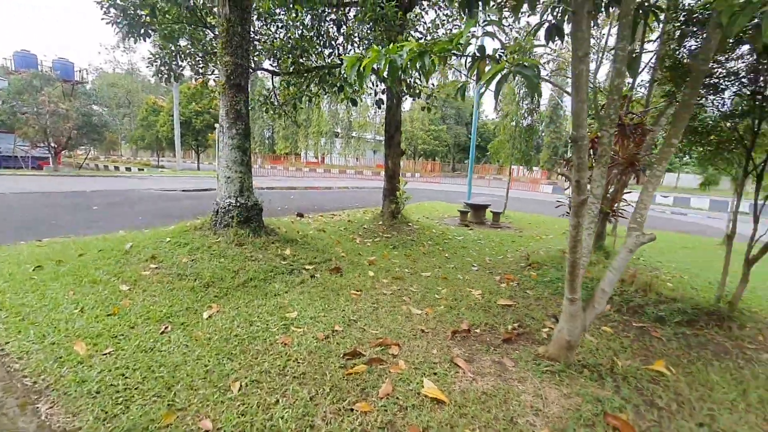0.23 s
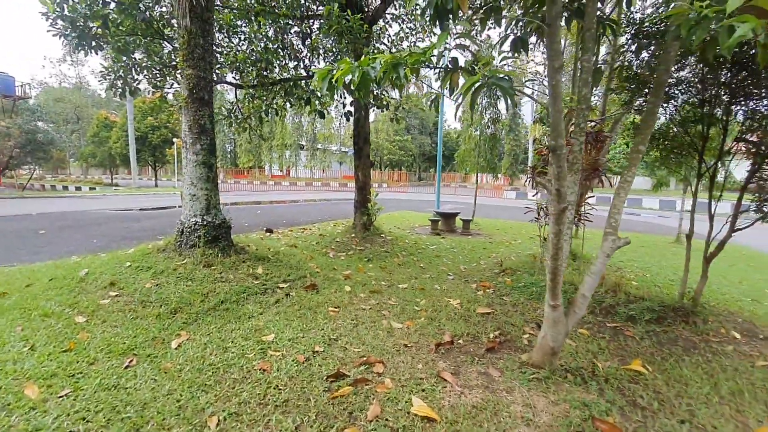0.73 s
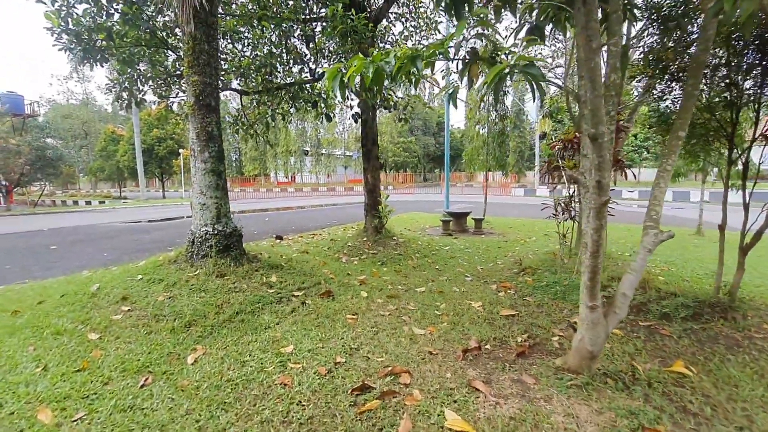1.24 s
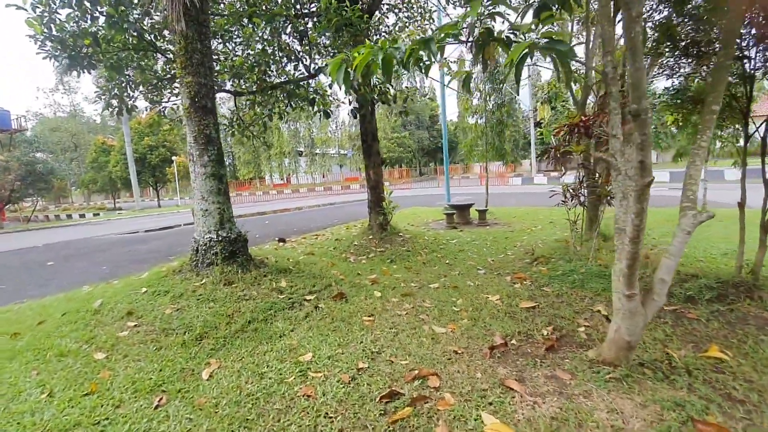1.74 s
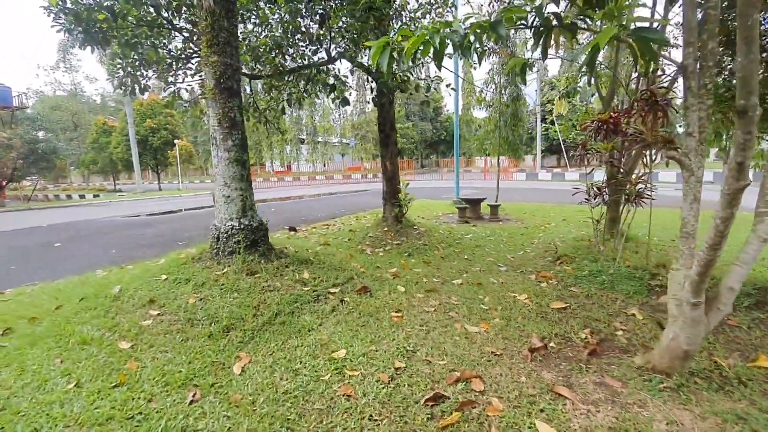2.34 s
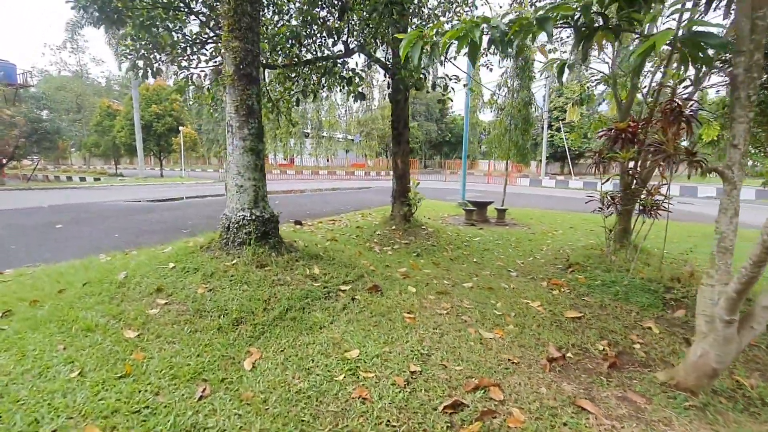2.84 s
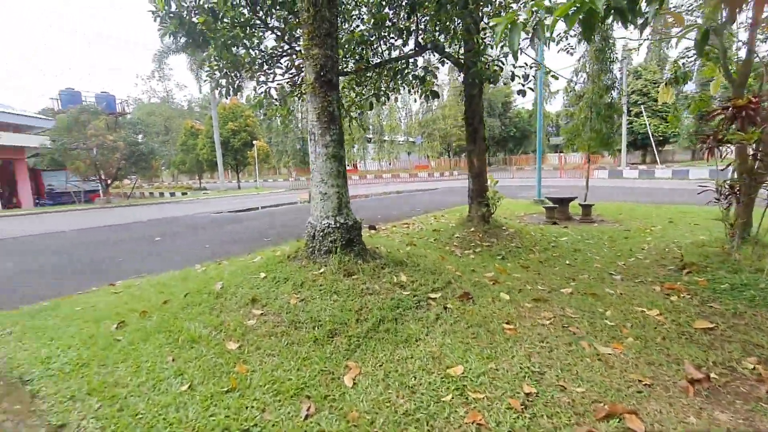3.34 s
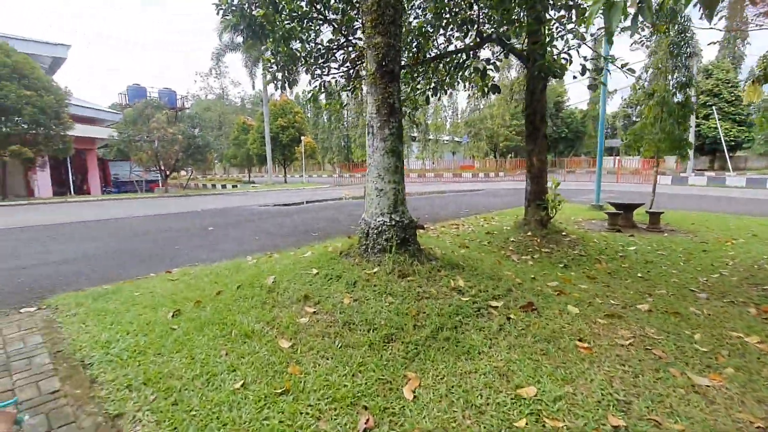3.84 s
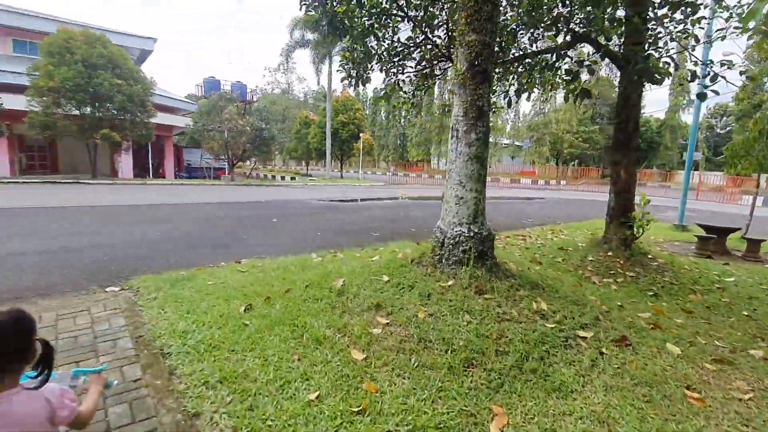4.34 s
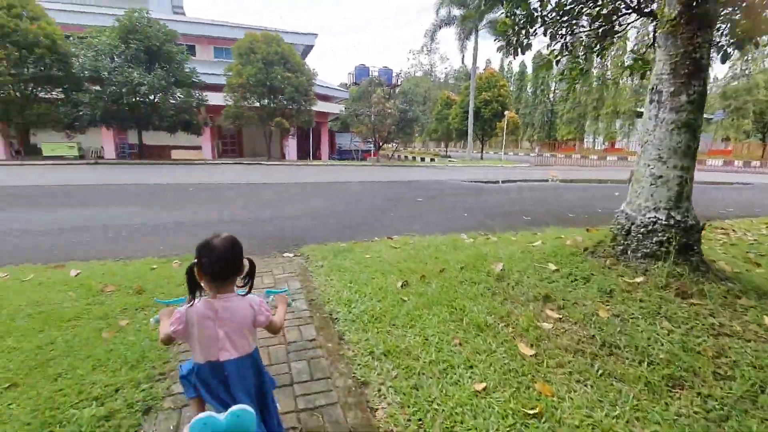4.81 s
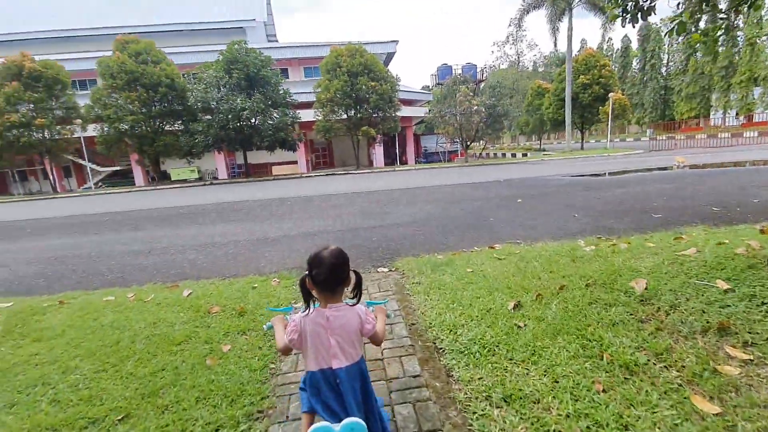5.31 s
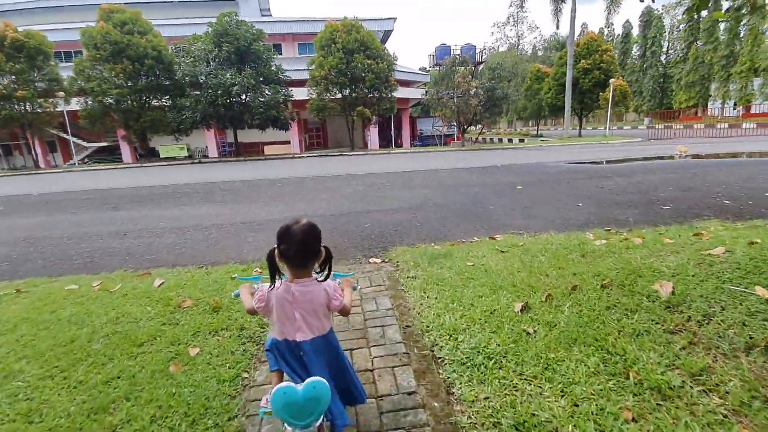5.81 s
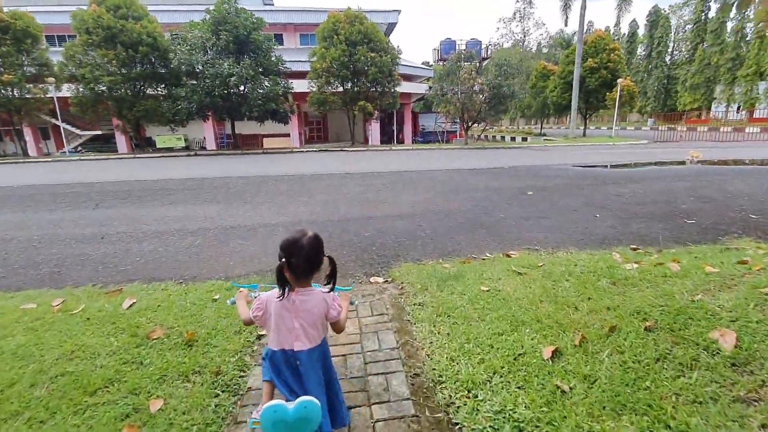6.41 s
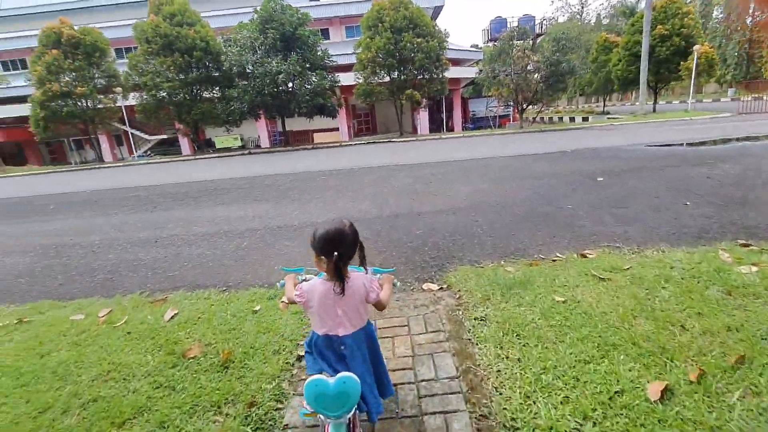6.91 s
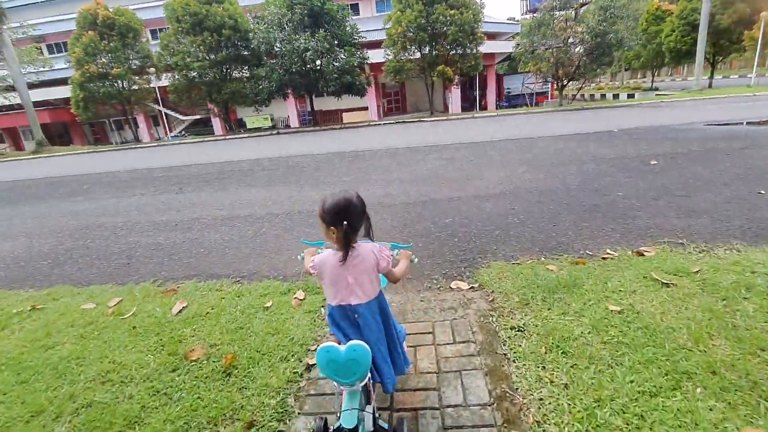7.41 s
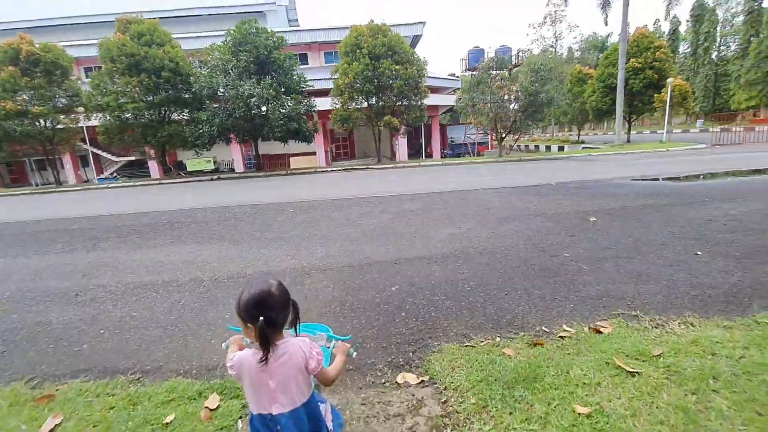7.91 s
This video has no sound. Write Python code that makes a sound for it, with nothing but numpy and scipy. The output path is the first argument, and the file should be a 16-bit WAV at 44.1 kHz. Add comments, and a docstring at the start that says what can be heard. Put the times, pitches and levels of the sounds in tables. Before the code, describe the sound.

Rapid freewheel ticks come about once a second as a little bike creeps over pavers, loose parts clacking, shoes scraping grit, low rumble beneath.

```python
"""Small bicycle with a swinging pedal

A small child's bicycle creeps along a paved path outdoors, with someone walking close behind.
The pedals swing backwards again and again: noise bursts tick as the freewheel, coloured noise rustles
as the chain, then the drive catches with a clank and steel rings. Loose parts rattle as short decaying
tones and bursts. Grainy noise makes scuffing soles and tyres, above a low rumble and faint thin buzzes.
"""
import sys
import numpy as np
from scipy import signal
from scipy.fft import rfft, irfft, next_fast_len
from scipy.io import wavfile
from scipy.ndimage import uniform_filter1d, map_coordinates

SR = 44100
rng = np.random.default_rng(int(sys.argv[2]) if len(sys.argv) > 2 else 0)


def generate_wav(signal):
    """Clip the signal to [-1, 1] and save it as 16-bit WAV at the path in sys.argv[1]."""
    frames = np.transpose(np.atleast_2d(signal))
    scaled = np.clip(frames, -1, 1) * 32767
    pcm = np.round(scaled).astype(np.int16)
    wavfile.write(sys.argv[1], SR, pcm)


N = 359415  # length in samples


# backward pedal swings: (first tick [s], tick gap at full speed [s], time lost speeding up [s],
# time lost slowing [s], teeth [count], tick level [dB], chain level [dB])
PEDAL_SWINGS = [(.5485, .02, .0124, .0482, 11, -41.5, -49), (1.6323, .0203, .0211, .0258, 14, -38, -48.5),
                (2.7415, .0162, .0231, .011, 15, -36.5, -44.5), (3.7849, .0192, .0161, .0044, 15, -36, -47),
                (4.7848, .019, .0251, .0113, 14, -39.5, -48), (5.7621, .0177, .0204, .0099, 16, -38.5, -47),
                (6.7509, .0195, .011, .0577, 17, -39, -47.5)]
# colour of one tick: (frequency [Hz], level [dB])
TICK_COLOUR = [(500, -38), (2500, -25), (4500, -8), (7200, -15.5), (8800, -2.5), (10200, -5), (11700, -1),
               (14000, -12), (16000, -3.5)]
# colour of the running chain: (frequency [Hz], level [dB])
CHAIN_COLOUR = [(100, -46), (300, -3), (520, -6.5), (750, 3), (1200, 1.5), (2000, -11.5), (3000, -8),
                (4200, -14), (7000, -14), (16000, -11)]
# rings of the chain guard and frame: (frequency [Hz], width [Hz], lift [dB])
GUARD_RINGS = [(849, 12, 11.5), (950, 160, 0), (1660, 270, 12), (2376, 360, 9), (3060, 170, 3.5)]


def freewheel():
    """In each swing the pawl drops over tooth after tooth, while the chain runs through its guard."""
    ticks, chain_level = np.zeros((2, N)), np.zeros(N)
    t = np.arange(N) / SR
    for first, gap, lead, lag, teeth, tick_db, chain_db in PEDAL_SWINGS:
        tooth = np.arange(teeth)
        # the crank gathers speed over the first teeth and loses it over the last
        speeding_up = lead * (1 - np.exp(-tooth / 1.2))
        slowing_down = lag * np.exp((tooth - tooth[-1]) / 1.2)
        times = first + gap * tooth + speeding_up + slowing_down
        for s in times:
            tick = blow(lambda hz: along(TICK_COLOUR, hz),
                        attack=.0005, crack_t60=.016, ring_t60=.14, ring_db=-19)
            add(ticks, s - .0005, amp(tick_db + rng.normal(.5, 2)) * tick)
        # the chain is louder the faster the teeth pass
        speed = gap / np.gradient(times)
        run_times = [times[0] - .015, *times, times[-1] + .038]
        chain_level += amp(chain_db) * np.interp(t, run_times, [0, *speed, 0])
    links = noise(lambda hz: along(CHAIN_COLOUR, hz) + rings(GUARD_RINGS, hz), size=N, grit_db=-.5)
    chain = chain_level * patchy(links, depth_db=3, size=512)
    return steel(ticks, ring_db=-8) + chain


# the drive catches: (time [s], level [dB], added bass [dB], added treble [dB])
DRIVE_CATCHES = [(1.2369, -43.5, 7, -8), (1.375, -47, 0, -8), (1.432, -35.5, 12, 0.5),
                 (1.8801, -39.5, 3, -8), (2.2002, -35.5, 9.5, 5), (2.376, -32.5, 8, 5),
                 (3.9895, -37, 4, -1), (4.1544, -37, 3, -11), (4.675, -36, 3.5, -5), (5.337, -33, 10.5, -4),
                 (6.119, -34, 10, -14), (6.998, -41.5, -16, -2), (7.093, -40, 8, -4.5)]
# colour of a clank: (frequency [Hz], level [dB])
CLANK_COLOUR = [(150, -0.5), (700, 0.5), (2000, 8.5), (4000, 3.5), (7000, 1.5), (10000, 1), (13000, 5),
                (16000, -7)]


def clanks():
    """Slack is taken up: chain and pawl hit the sprocket."""
    out = np.zeros((2, N))
    for s, db, knock_db, treble_db in DRIVE_CATCHES:
        colour = lambda hz: along(CLANK_COLOUR, hz) + tone(hz, knock_db, treble_db)
        clank = blow(colour, attack=.00044, crack_t60=.025, ring_t60=.13, ring_db=-3.5)
        add(out, s, amp(db) * clank)
    return steel(out, ring_db=-7)


# rings of pawl and sprocket: (frequency [Hz], level [dB], time to fade by 60 dB [s])
STEEL_RINGS = [(3020, -2, 0.053), (3283, 4, 0.04), (5740, 5, 0.025), (6150, 2.5, .06), (8400, -6, 0.067),
               (10100, -3, 0.06), (10750, -20, .04), (11620, -0.5, .05), (11780, -0.5, 0.037),
               (12600, -11, 0.035), (14170, -3, .05), (14450, 0, .05)]


def steel(x, ring_db):
    """Every blow on the hub sets the same steel modes ringing."""
    t = np.arange(SR // 8) / SR
    ring = np.zeros((2, len(t)))
    for hz, db, t60 in STEEL_RINGS:
        phase = rng.uniform(0, 2 * np.pi, (2, 1))  # each ear has its own
        ring += amp(db - 60 * t / t60) * np.sin(2 * np.pi * hz * t + phase)
    ring *= 1 - np.exp(-t / .00029)
    ring /= np.linalg.norm(ring[0])
    return x + amp(ring_db) * signal.fftconvolve(x, ring, axes=1)[:, :N]


# the loudest rattles of loose parts: (time [s], frame level [dB], clack level [dB], clack pitch [Hz],
# added bass in the frame [dB], added treble in the frame [dB])
LOUD_RATTLES = [(0.2781, -44, -38, 1530, 34, 5), (0.2887, -33, -40, 2120, 29, 33.5),
                (0.7152, -39, -38, 2440, 13.5, 13), (1.318, -39.5, -35, 1590, 6, 0),
                (2.5326, -33.5, -23, 1800, 10, 8), (2.9519, -26, -26, 2800, 6, -9),
                (3.0662, -30, -30, 1660, 18, 12), (3.3831, -29.5, -26, 2750, -1.5, 8.5),
                (3.5501, -32, -29.5, 2700, 8.5, 9), (4.2042, -36, -37, 1710, 9, 3),
                (4.359, -38, -43, 3200, 15.5, 14.5), (5.1416, -28, -32, 1680, 25, 9),
                (5.1593, -34, -17, 2490, 6, 16.5), (5.1981, -41, -30.5, 2570, 3, -22),
                (5.4867, -44, -30.5, 2800, 3, -4), (5.5007, -31.5, -29, 2440, 10, 5.5),
                (5.612, -36, -35, 2630, 15.5, 12), (5.662, -34, -24.5, 2190, 12, -22),
                (5.6852, -42, -32, 1520, 23, 15), (5.89, -29, -29, 2930, 13, 9),
                (6.246, -36.5, -63, 1610, 20.5, 26), (6.419, -43, -26, 1420, -8, 12),
                (6.635, -40, -38, 2310, -4, 1), (6.779, -37, -33.5, 2580, 18, 13),
                (7.226, -34.5, -19.5, 2430, 3, 9), (7.2763, -37.5, -34, 1520, 18, 15),
                (7.3837, -35, -33, 2520, -10, 4.5), (7.409, -40, -35, 2460, 23, 13),
                (7.8171, -35.5, -31, 2510, 9, 17), (8.023, -48, -31.5, 1650, 12, 10)]


def rattles():
    """Loose fittings clack as the wheels cross joints."""
    out = np.zeros((2, N))
    for s, *hit in LOUD_RATTLES:
        add(out, s - TOUCH_S + .0006, rattle(*hit))
    return out


TOUCH_S, TOUCH_DB = .006, -23  # a light touch this long before the clack; level against the clack
BOUNCE_S, BOUNCE_DB = .022, -18.5  # middle delay of the bounce; level against the clack
# colour of the shaken frame: (frequency [Hz], level [dB])
FRAME_COLOUR = [(120, -24), (270, 11), (500, 0), (800, 12), (1800, 9), (3200, 11.5), (4500, 2), (8000, -3),
                (12000, -4.5), (16000, -11)]


def rattle(frame_db, clack_db, ring_hz, knock_db, treble_db):
    """A loose fitting touches, clacks and bounces at its own pitch, and shakes the frame."""
    peak_s = .00083  # time for each clack to swell to its peak
    t = np.arange(SR // 4) / SR - TOUCH_S
    bounce_s = BOUNCE_S * rng.uniform(.5, 1.5)
    clack = np.zeros(len(t))
    for s, db in [(-TOUCH_S, TOUCH_DB), (0, 0), (bounce_s, BOUNCE_DB)]:
        since = np.maximum(t - s, 0)
        swell = since / peak_s * np.exp(1 - since / peak_s)
        clack += amp(db) * swell * np.sin(2 * np.pi * ring_hz * since)
    modes = GUARD_RINGS + [(ring_hz, 400, 6)]
    colour = lambda hz: along(FRAME_COLOUR, hz) + rings(modes, hz) + tone(hz, knock_db, treble_db)
    frame = blow(colour, attack=.0016, crack_t60=.028, ring_t60=.17, ring_db=-7.5)
    # the frame answers the clack, not the light touch before it
    frame = np.pad(frame, [(0, 0), (round(TOUCH_S * SR), 0)])[:, :len(t)]
    return amp(clack_db) * clack + amp(frame_db) * frame


CHATTER_PER_S = 6
CHATTER_DB, CHATTER_SPREAD_DB = 2.5, 7  # level over the tyres, and its scatter
CHATTER_HZ, CHATTER_SPREAD_OCT = 2470, .344  # middle pitch, and its scatter in octaves
# how loudly the tyres roll, also followed by the chatter: (time [s], level [dB])
ROLL_LEVEL = [(0, -61.5), (.6, -59), (1.1, -70), (1.55, -57.5), (2.3, -60.5), (3.35, -65), (3.62, -54.5),
              (4.28, -60.5), (4.65, -53), (5.27, -57.5), (5.45, -46.5), (5.78, -57), (6.55, -54),
              (6.75, -49.5), (7.15, -56.5), (7.38, -55.5), (7.7, -58), (8.15, -75)]


def chatter():
    """Small rattles come at random, as strong as the rolling that shakes them loose."""
    out = np.zeros((2, N))
    count = int(CHATTER_PER_S * N / SR)
    for k, (late, strength, pitch) in enumerate(rng.standard_normal((count, 3))):
        s = (k + late / 2) / CHATTER_PER_S
        roll_db = np.interp(s, *np.transpose(ROLL_LEVEL))
        db = roll_db + CHATTER_DB + CHATTER_SPREAD_DB * np.clip(strength, -2, 1)
        ring_hz = CHATTER_HZ * 2 ** (CHATTER_SPREAD_OCT * pitch)
        add(out, s, rattle(db, db + 1, ring_hz, knock_db=11.5, treble_db=12.5))
    return out


# soles scuff on gritty pavers: (loudest moment of the drag [s], rise [s], fall [s], drag level [dB],
# rasp pitch [Hz], added bass [dB], hiss level [dB], time the hiss comes before the drag [s])
SOLE_SCUFFS = [(.294, 0.027, .14, -36.5, 1420, 4.5, -44, 0.055),
               (.87, 0.085, 0.29, -51, 2250, 9, -57, 0.034), (1.271, 0.058, 0.26, -51.5, 2370, 5, -68, .02),
               (2.005, .04, 0.055, -42.5, 1520, 0, -39.5, 0.093),
               (2.503, .019, .05, -45, 3260, -3, -50, .005),
               (2.64, 0.024, 0.071, -33, 1860, -1, -32, 0.056), (3.09, .05, 0.54, -52, 680, 6, -48, 0.028),
               (4.187, 0.015, 0.042, -41, 775, 4, -54, .02),
               (4.56, 0.025, 0.083, -33.5, 1020, -3, -38.5, 0.039),
               (5.17, 0.019, 0.035, -36, 2450, 0, -60, .02),
               (5.672, 0.051, 0.053, -37.5, 1590, 4, -53, .04),
               (6.155, 0.044, 0.08, -45, 1150, 13, -75, .03),
               (6.35, 0.026, 0.046, -32, 1840, -9, -37, 0.029),
               (6.39, 0.055, 0.056, -33.5, 1800, -7, -52, 0.025),
               (7.055, 0.022, 0.032, -41, 2530, 4, -69, 0.018),
               (7.281, 0.0093, 0.04, -35, 1700, -2, -46.5, 0.058),
               (7.327, .02, 0.094, -39.5, 1390, -1.5, -48.5, .01),
               (7.549, 0.027, 0.08, -50, 1140, 16, -81, .02),
               (8.028, 0.022, 0.1, -38, 1080, -2, -40.5, 0.041)]
# the sole's own broad resonance: (frequency [Hz], width [Hz], lift [dB])
SOLE_BODY = [(1590, 2100, 2.5)]


def scuffs():
    """A sole skims the grit with a hiss, then takes weight and drags with a rasp."""
    out, t = np.zeros((2, N)), np.arange(-SR // 6, SR // 3) / SR

    def swell(u, rise, fall):
        """Level in dB around the loudest moment, 20 dB down after one rise or fall time."""
        return -20 * np.where(u < 0, (u / rise) ** 2, u / fall)

    for s, rise, fall, drag_db, rasp_hz, bass_db, hiss_db, lead in SOLE_SCUFFS:
        hiss = grit(db_per_oct=5, rasp_hz=3210, size=len(t))
        hiss = amp(hiss_db + swell(t + lead, rise=.024, fall=.15)) * hiss
        drag = grit(db_per_oct=.26, rasp_hz=rasp_hz, size=len(t), body=SOLE_BODY, bass_db=bass_db)
        drag = amp(drag_db + swell(t, rise, fall)) * drag
        add(out, s + t[0], hiss + drag)
    return out


def tyres():
    """The tyres crunch unevenly over the same grit."""
    roll_db, = curves(ROLL_LEVEL)
    uneven_db = 1.5 * wobble(12)
    return amp(roll_db + uneven_db) * grit(db_per_oct=-1.5, rasp_hz=2560, size=N)


# colour of grit on stone: (frequency [Hz], level [dB])
GRIT_COLOUR = [(100, -15), (280, -2), (480, -7), (780, 2), (1300, -3.5), (1900, -3), (3000, -5),
               (4500, -11), (7800, -16.5), (10000, -19), (16000, -22)]


def grit(db_per_oct, rasp_hz, size, body=(), bass_db=0):
    """Grit on stone: a grainy rasp with one strong pitch."""
    modes = [(rasp_hz, .11 * rasp_hz, 6), *body]

    def colour(hz):
        """Level in dB at each pitch: the grit, tilted, with more or less bass and its resonances."""
        tilt = db_per_oct * np.log2(np.clip(hz, 600, 6000) / 2000)
        bass = bass_db / (1 + (hz / 650) ** 4)
        return along(GRIT_COLOUR, hz) + tilt + bass + rings(modes, hz)

    return patchy(noise(colour, size=size, grit_db=2.5), depth_db=4, size=384)


REST_HZ, GLIDE_S = 3750, .55  # pitch the thin buzzes slide towards, and how slowly
BUZZ_HALF_WIDTH_HZ, BUZZ_EDGE_S = 190, .04  # half the width of a buzz; its fade in and out
# faint thin buzzes: (start [s], length [s], starting pitch [Hz], level [dB])
SLIDING_BUZZES = [(0, .5, 5100, -69.5), (.8, .4, 4300, -68), (1.2, .42, 5300, -68.5), (2.1, .45, 3700, -76),
                  (5.25, .4, 5100, -74), (7.15, .25, 4750, -61.5)]
# the higher buzz: (time [s], level [dB])
HIGH_BUZZ_LEVEL = [(0, -78), (1.5, -77), (3, -76), (3.45, -67), (4, -74), (8.15, -75)]


def thin_buzzes():
    """Thin buzzes: narrow noise on a sliding tone, mostly sinking; another swells and fades, higher up."""
    out, t = np.zeros((2, N)), np.arange(SR) / SR
    for s, length, start_hz, db in SLIDING_BUZZES:
        hz = REST_HZ + (start_hz - REST_HZ) * np.exp(-t / GLIDE_S)
        carrier = np.sin(2 * np.pi * np.cumsum(hz) / SR)
        band = noise(lambda f: -10 * np.log10(1 + (f / BUZZ_HALF_WIDTH_HZ) ** 4), size=len(t))
        hold = np.clip(np.minimum(t, length - t) / BUZZ_EDGE_S, 0, 1)
        add(out, s, amp(db) * hold * unit(band * carrier))
    high = noise(lambda f: -10 * np.log10(1 + ((f - 9450) / 220) ** 4), size=N)
    flutter, swell = amp(2 * wobble(14)), amp(2 * wobble(4))
    high_db, = curves(HIGH_BUZZ_LEVEL)
    return flutter * out + amp(high_db) * swell * high


# colour of the low rumble: (frequency [Hz], level [dB])
RUMBLE_COLOUR = [(10, -80), (25, -46), (40, -14.5), (62, -2), (80, 2), (100, -4), (135, -2.5), (195, -15.5),
                 (300, -18.5), (420, -22), (560, -47), (920, -120)]
# colour of the open air: (frequency [Hz], level [dB])
AIR_COLOUR = [(200, 6.5), (350, -14), (600, 2), (1000, -38), (2000, -24), (3600, -3), (5500, -13.5),
              (8000, -11.5), (12000, -16), (16000, -30)]


def outdoors():
    """A steady low rumble under soft open air, both coloured noise that sways a little in level."""
    rumble = noise(lambda hz: along(RUMBLE_COLOUR, hz), size=N)
    air = noise(lambda hz: along(AIR_COLOUR, hz), size=N, grit_db=3)
    air = patchy(air, depth_db=2.2, size=2048)
    return amp(-47 + .2 * wobble(5)) * rumble + amp(-62 + 1.1 * wobble(3.5)) * air


# how long the echo lasts: (frequency [Hz], time to fade by 60 dB [s])
YARD_FADE = [(200, 0.43), (2000, 0.14), (12000, 1)]


def yard(x):
    """Ground and trees scatter a short tail: noise that fades at its own pace at each pitch."""
    hz, t, z = signal.stft(rng.standard_normal((2, SR // 2)), SR, nperseg=256)
    fade = amp(-60 * t / along(YARD_FADE, hz)[:, None])
    tail = signal.istft(z * fade, SR, nperseg=256)[1]
    return signal.fftconvolve(x, tail / np.linalg.norm(tail[0]), axes=1)[:, :N]


def blow(colour_db, attack, crack_t60, ring_t60, ring_db):
    """A contact: a short crack, then the dense ring of the part (times in s)."""
    t = np.arange(SR // 4) / SR
    fade = amp(-60 * t / crack_t60) + amp(ring_db - 60 * t / ring_t60)
    return noise(colour_db, size=len(t)) * fade * (1 - np.exp(-t / attack))


def tone(hz, knock_db, treble_db):
    """A heavy contact has more bass, a hard one more treble."""
    return knock_db / (1 + (hz / 1200) ** 4) + treble_db / (1 + (4500 / (hz + 1)) ** 4)


def rings(modes, hz):
    """dB lift of a set of resonances."""
    return sum(db / (1 + (2 * (hz - centre) / width) ** 2) for centre, width, db in modes)


# how alike the two ears hear noise: (frequency [Hz], likeness [0 to 1])
EAR_LIKENESS = [(25, 0.31), (60, 0.94), (250, 0.86), (800, 0.63), (1500, 0.42), (2600, 0.21), (4500, 0.13),
                (9000, 0.022)]


def noise(colour_db, size, grit_db=0):
    """Stereo noise of rms 1; grit_db breaks it into grains of uneven loudness before it is coloured."""
    m = next_fast_len(size)
    hz = np.fft.rfftfreq(m, 1 / SR)
    grain_db = grit_db * np.clip(rng.standard_normal(m // 48 + 1), -2, 2)
    grains = np.repeat(amp(grain_db), 48)[:m]  # each grain lasts 48 samples
    # the less alike the ears, the more goes to the side signal
    turn = np.arccos(np.clip(along(EAR_LIKENESS, hz), -1, 1)) / 2
    spectrum = rfft(grains * rng.standard_normal((2, m))) * amp(colour_db(hz))
    mid, side = irfft(spectrum * [np.cos(turn), np.sin(turn)], m)[:, :size]
    return unit(np.array([mid + side, mid - side]))


def patchy(x, depth_db, size):
    """Small patches of time and pitch swell and sink at random; size is the analysis window in samples."""
    z = signal.stft(x, nperseg=size)[2]
    field = rng.standard_normal(z.shape[1:])
    for axis in (0, 1):
        field = uniform_filter1d(field, size=3, axis=axis)
    shaped = signal.istft(z * amp(depth_db * unit(field)), nperseg=size)[1]
    return unit(shaped[:, :x.shape[1]])


def amp(db):
    """Turn dB into a plain factor."""
    return 10 ** (np.asarray(db) / 20)


def unit(x):
    """Scale to an rms of 1."""
    return x / np.sqrt(np.mean(x ** 2) + 1e-20)


def along(points, hz):
    """Read a curve of (Hz, value) points on a log axis."""
    f, v = np.transpose(points)
    return np.interp(np.log(hz + 1), np.log(f + 1), v)


def curves(rows):
    """One value per sample for each column after the time."""
    s, *cols = np.transpose(rows)
    return [np.interp(np.arange(N) / SR, s, c) for c in cols]


def wobble(rate):
    """A smooth random curve, rate knots a second."""
    knots = rng.standard_normal(int(N * rate / SR) + 4)
    return map_coordinates(knots, [np.arange(N) * rate / SR])


def add(track, s, sound):
    """Mix a sound into a track at time s."""
    start = max(round(s * SR), 0)
    part = sound[:, :max(N - start, 0)]
    track[:, start:start + part.shape[1]] += part


# where the bicycle is: (time [s], lead of the left ear [samples])
BICYCLE_BEARING = [(0, 11.5), (2.2, 12), (3.9, 16.5), (4.9, 8), (5.6, 4), (5.9, 7), (6.8, 5), (7.3, -1.5),
                   (8.15, 5)]


def scene():
    """The bicycle starts on the left and later comes nearer the middle; scuffs and tyres get no ear delay."""
    left, right = freewheel() + clanks() + rattles() + chatter()
    lead, = curves(BICYCLE_BEARING)
    right = map_coordinates(right, [np.arange(N) - lead], order=5)  # the right ear hears it later
    bicycle = np.array([left, right]) * amp([[1.3], [-1.4]])  # left and right balance in dB
    ground = (scuffs() + tyres()) * amp([[.7], [-.8]])
    near = bicycle + ground
    far = thin_buzzes() + outdoors()
    return near + amp(-20) * yard(near) + far


def record(dry):
    """Nothing is kept at or above the band limit."""
    top_hz = 15950
    m = next_fast_len(N + SR // 2)
    keep = np.fft.rfftfreq(m, 1 / SR) < top_hz
    return irfft(rfft(dry, m) * keep, m)[:, :N]


dry = scene()
out = record(dry)
generate_wav(out)
```